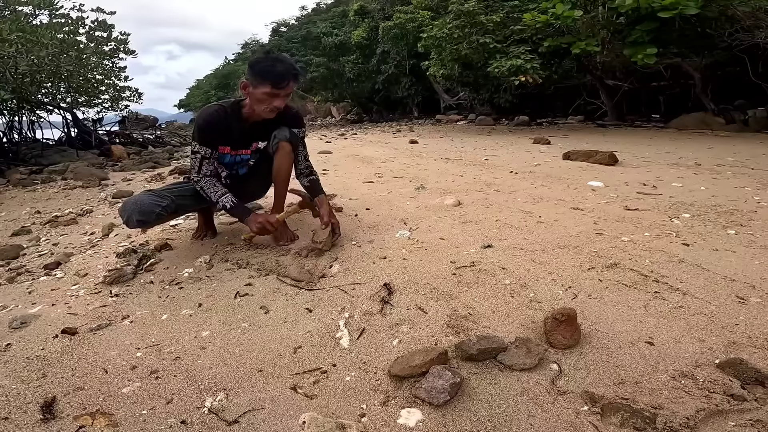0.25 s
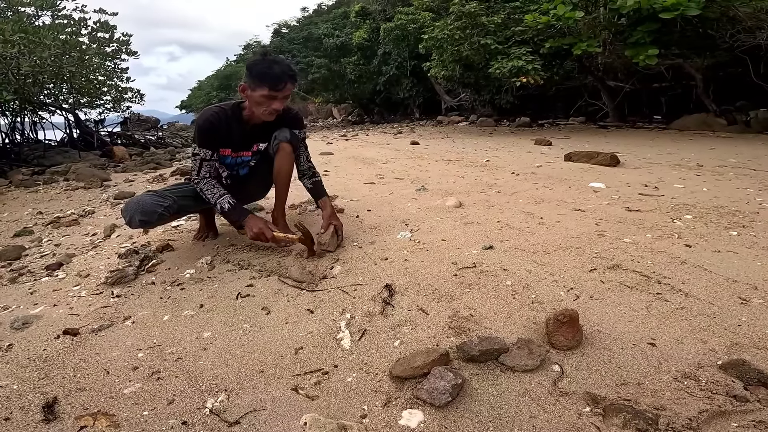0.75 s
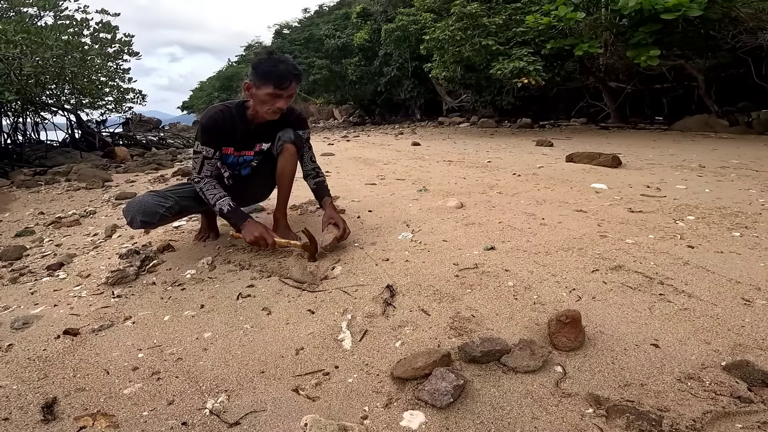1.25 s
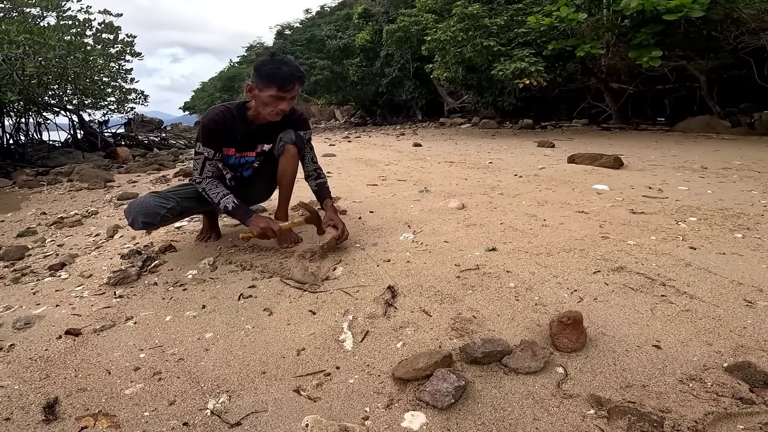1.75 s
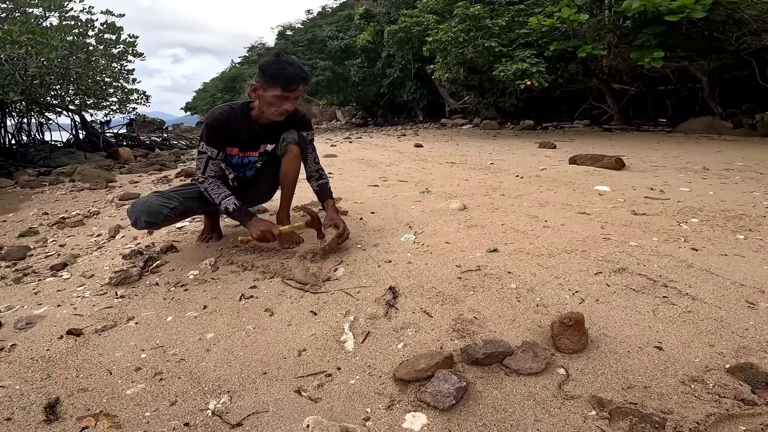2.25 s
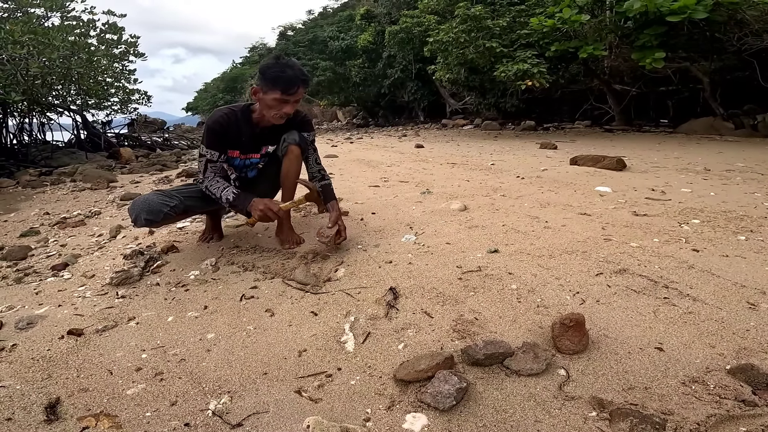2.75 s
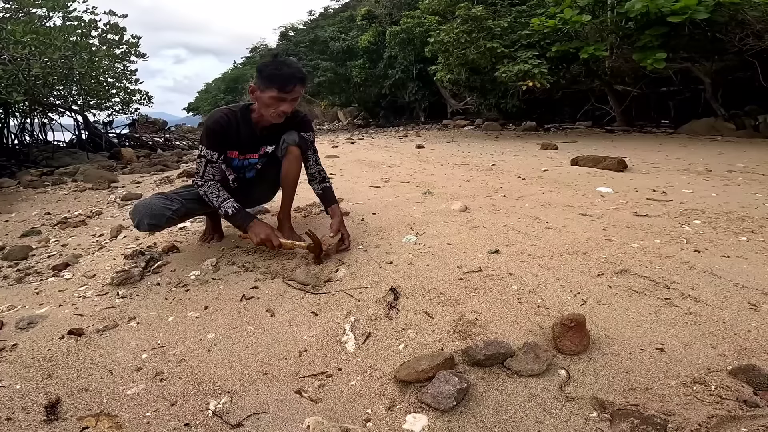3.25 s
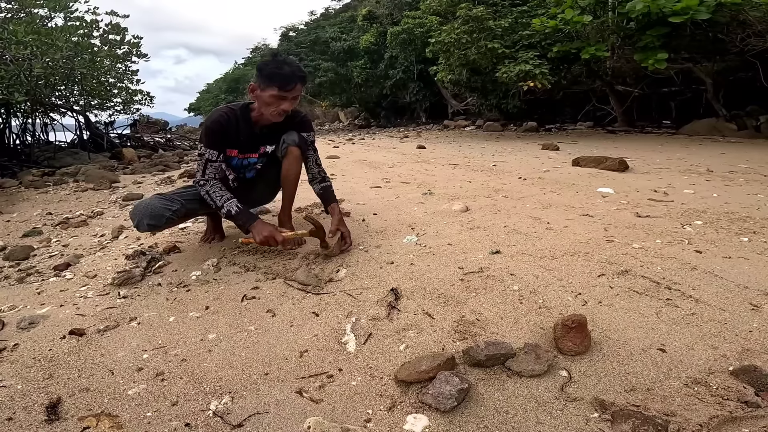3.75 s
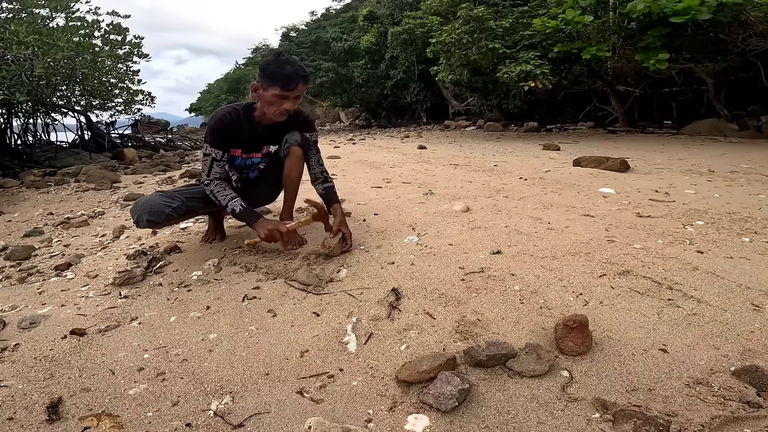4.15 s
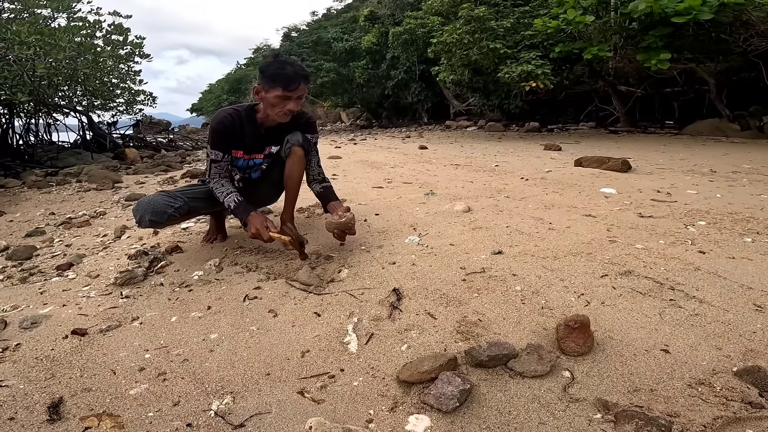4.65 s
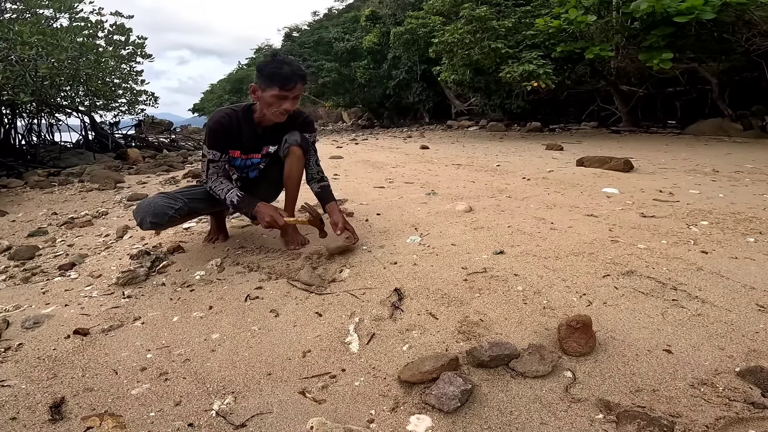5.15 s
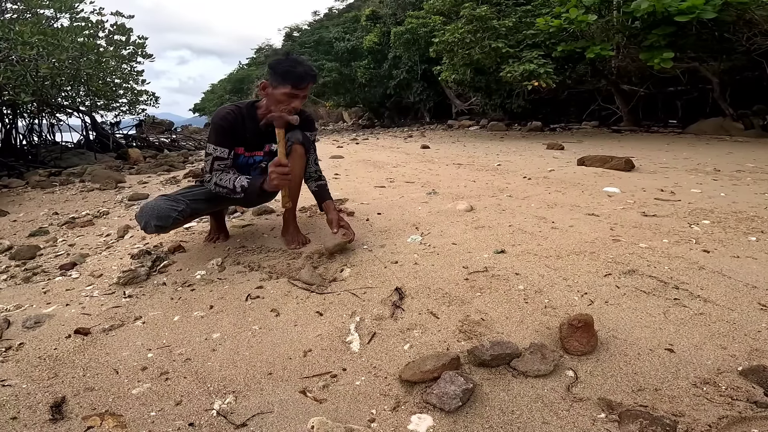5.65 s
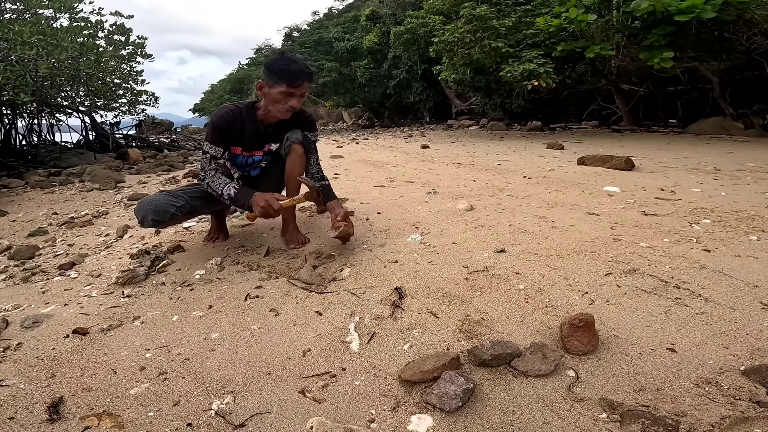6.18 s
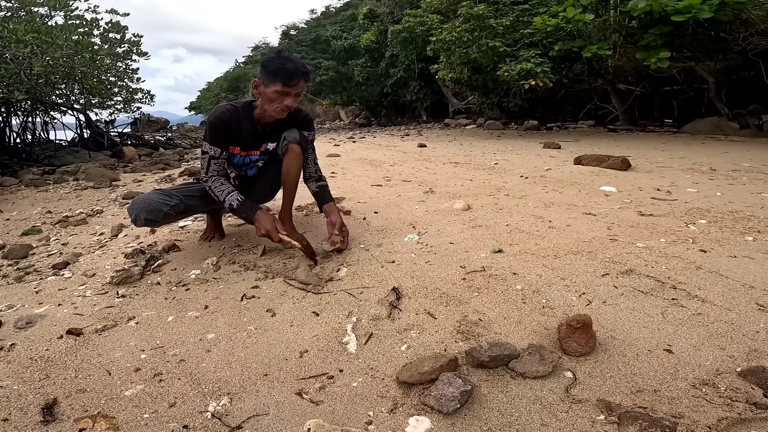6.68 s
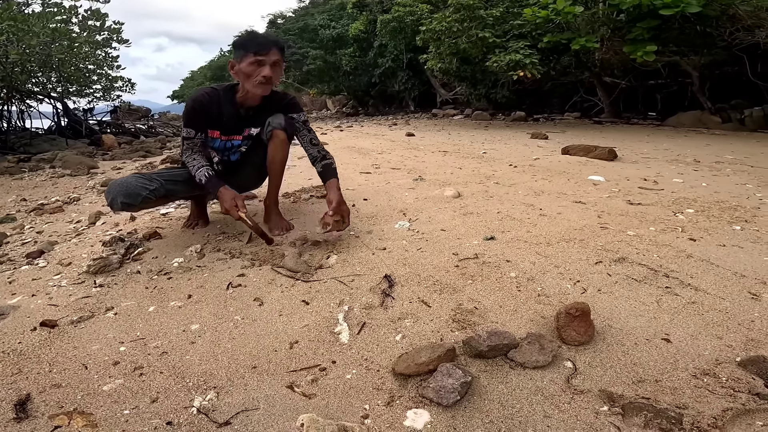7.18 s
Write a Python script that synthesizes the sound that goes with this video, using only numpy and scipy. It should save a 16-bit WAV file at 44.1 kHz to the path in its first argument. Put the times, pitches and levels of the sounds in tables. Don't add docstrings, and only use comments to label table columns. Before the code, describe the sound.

Irregular hard clacks of steel on stone, close and nearly clipping, answered by a patchy woodland echo. Early blows are spaced about half a second apart; the hardest land near four and six seconds, and a quick cluster of lighter clicks ends the action. Low wind buffets the camera microphone, strongest around six seconds, over distant surf, a wavering engine hum, faint insect buzz, bird whistles and trickling sand.

```python
import sys
import numpy as np
from scipy import signal
from scipy.io import wavfile
from scipy.ndimage import uniform_filter1d

SR = 44100
rng = np.random.default_rng(int(sys.argv[2]) if len(sys.argv) > 2 else 0)


def put_to_file(sound):
    columns = np.atleast_2d(sound).T
    safe = np.clip(columns, -1, 1)
    whole_steps = np.round(safe * 32767)
    wavfile.write(sys.argv[1], SR, whole_steps.astype(np.int16))


def decibels_to_gain(level_db):
    exponent = np.asarray(level_db, float) / 20
    return 10 ** exponent


N = 327222
T = np.arange(N) / SR
CALM_DB = -44
# delay_s, gain
NEAR_ECHOES = [(.0027, .55), (.0037, .5), (.0048, .35), (.0062, .15)]


def noise():
    return rng.standard_normal(N)


def band(x, lo_hz, hi_hz, order=2):
    edges_hz = [lo_hz, min(hi_hz, .45 * SR)]
    return signal.sosfilt(signal.butter(order, edges_hz, "band", fs=SR, output="sos"), x)


def unit(x):
    return x / np.sqrt(np.mean(x ** 2))


def walk(rate_hz):
    k = int(SR / rate_hz)
    steps = np.repeat(rng.standard_normal(N // k + 1), k)
    return unit(uniform_filter1d(uniform_filter1d(steps, k), k)[:N])


def columns(table):
    s, *rest = np.transpose(table)
    return [np.interp(T, s, c) for c in rest]


def swells(table, rest_db):
    power = decibels_to_gain(2 * rest_db)
    power = power + sum(decibels_to_gain(2 * db) * bell(T, s, length_s) for s, db, length_s in table)
    return 10 * np.log10(power)


def bell(t, centre_s, width_s):
    return np.exp(-((t - centre_s) / width_s) ** 2)


def burst(t, hz, delay_s, width_s):
    return np.sin(2 * np.pi * hz * (t - delay_s)) * bell(t, delay_s, width_s)


def decay(t, t60_s):
    return 1000. ** (-t / t60_s)


def ring(t, hz, t60_s, rise_s, delay_s=0.):
    u = np.maximum(t - delay_s, 0)
    return np.sin(2 * np.pi * hz * u) * (1 - np.exp(-u / rise_s)) * decay(u, t60_s)


def tone(table, wobble, rate_hz):
    hz, db = columns(table)
    inside = uniform_filter1d(1. * ((T > table[0][0]) & (T < table[-1][0])), size=400)
    phase = 2 * np.pi * np.cumsum(hz * (1 + wobble * walk(rate_hz))) / SR
    return np.sqrt(2) * inside * decibels_to_gain(db + 2.0 * walk(rate_hz)) * np.sin(phase)


def add(out, s, sound):
    i = int(s * SR)
    out[i:i + len(sound)] += sound[:N - i]


def wind_db():
    # peak_s, rumble_db, length_s
    gusts = [(1.01, -34.5, 0.083), (1.22, -33, 0.079), (1.61, -34.5, .1), (1.9, -38.5, 0.08),
             (3.04, -30.5, 0.048), (3.24, -29, 0.069), (3.47, -28.5, .05), (3.62, -31, .09),
             (3.86, -36.5, .05), (4.03, -42, .12), (4.73, -31.5, 0.055), (4.88, -30, 0.035),
             (5.07, -27.5, 0.091), (5.25, -29.5, 0.11), (5.46, -28, 0.065), (5.57, -28.5, 0.055),
             (5.76, -30, 0.068), (5.9, -28.5, .05), (5.99, -17, 0.0063), (6.09, -22.5, .015),
             (6.2, -17.5, 0.039), (6.36, -31.5, 0.052), (6.61, -34.5, 0.065), (6.9, -45, .1),
             (7.11, -35, 0.31)]
    return swells(gusts, CALM_DB)


def shore():
    # pitch_hz, level_db (per Hz)
    spectrum = [(120, -12), (190, -13.5), (257, -30), (381, -40), (800, -50), (4840, -55.5), (5950, -55),
                (9450, -74)]
    level_db, follows_wind = -67, 0.12
    hz, db = np.transpose(spectrum)
    out = 0
    for f in 120 * 2 ** np.arange(0, 7, .5):
        gain_db = np.interp(np.log(f), np.log(hz), db) + 1.5 * walk(14)
        out = out + decibels_to_gain(gain_db) * band(noise(), f / 1.19, f * 1.19, order=3)
    gain = decibels_to_gain(level_db + follows_wind * (wind_db() - CALM_DB))
    return out * gain / np.std(band(out, 280, 630))


def wind():
    # peak_s, buffet_db, length_s
    jolts = [(.8, -42.5, 0.055), (1.32, -41, 0.052), (1.9, -39, 0.077), (3.92, -39.5, .08),
             (4.36, -41, 0.087), (5.95, -34, 0.038), (6.08, -34.5, 0.078), (6.74, -41.5, 0.06)]
    rumble_db = wind_db()
    buffet_db = swells(jolts, -48.5) + 2 * walk(6)
    pops_db = 1.5 * (rumble_db + 25.5) - 48.5
    rumble = unit(band(noise(), 10, 48, order=3)) * decibels_to_gain(rumble_db - 2.7 + 2.5 * walk(9))
    buffet = unit(band(noise(), 68, 125)) * decibels_to_gain(buffet_db + 4.0 * walk(25))
    pops = unit(band(noise(), 140, 220, order=4)) * decibels_to_gain(pops_db + 1.0 * walk(40))
    return rumble + buffet + pops


def engine():
    # time_s, pitch_hz, level_db
    firing = [(0, 177, -49.5), (2, 174.8, -50), (4, 175, -52.5), (5.5, 172.8, -50.5), (7.42, 170.4, -56.5)]
    # time_s, pitch_hz, level_db
    throb = [(0, 81.5, -52), (2.5, 81, -51), (4.7, 81, -52), (5.2, 81, -59), (7.42, 81, -59)]
    return tone(firing, 0.0065, 14) + tone(throb, 0.0085, 4.0)


def insects():
    # peak_s, level_db, length_s
    chorus = [(.35, -68, .3), (1, -74, .3), (2.3, -78, .25), (3.05, -80, .12), (3.5, -65, .1),
              (3.8, -74.5, .15), (4.3, -78, .25), (5.5, -78.5, .12), (6.5, -67.5, .13), (7.36, -73, .12)]
    buzz = rng.standard_normal((2, N)) * decibels_to_gain(3.0 * walk(38))
    waves = unit(band(buzz[0], 5200, 6250, order=3))
    thin = unit(band(buzz[1], 6100, 6420))
    return waves * decibels_to_gain(swells(chorus, -84)) + thin * decibels_to_gain(-87 + 2.3 * walk(2))


def birds():
    # time_s, pitch_hz, level_db
    whistles = [
        [(1.11, 1834, -57), (1.128, 1820, -52), (1.228, 1910, -44), (1.242, 1810, -38), (1.285, 1831, -55)],
        [(6.945, 1850, -53), (6.961, 1890, -44.5), (6.997, 1660, -62), (7.02, 1830, -69)],
    ]
    # time_s, pitch_hz, level_db
    glides = [
        [(.205, 2980, -70.5), (.25, 3260, -63), (.3, 3660, -57.5), (.375, 4600, -59)],
        [(1.235, 1750, -57), (1.27, 1540, -55), (1.3, 1400, -47)],
        [(6.89, 1400, -65), (6.925, 1480, -57), (6.942, 1850, -59)],
        [(7.15, 1440, -58.5), (7.17, 1400, -57), (7.25, 1400, -69)],
    ]
    pulsing = .62 + .42 * np.cos(2 * np.pi * 29 * (T - 1.245))
    calls = pulsing * sum(tone(call, .006, 40) for call in whistles)
    flutter = 0.61 + .4 * walk(340)
    calls = calls + flutter * sum(tone(call, 0.0038, 280) for call in glides)
    wood = rng.standard_normal(SR // 8) * np.exp(-T[:SR // 8] / 0.035)
    return .9 * calls + .45 * signal.fftconvolve(calls, wood / np.linalg.norm(wood))[:N]


def sand():
    # peak_s, level_db, length_s
    slides = [(.1, -82, 0.048), (1.3, -86.5, 0.27), (2.2, -87, 0.35), (2.8, -81, .2), (3.45, -84.5, 0.14),
              (4.48, -85, 0.0984), (5.1, -81, .12), (6.05, -70.5, 0.055), (6.5, -88.5, 0.13),
              (6.8, -86, .08), (7.32, -78.5, 0.091)]
    landed = rng.random(N) < 3000 / SR
    ticks = landed * decibels_to_gain(2.6 * rng.exponential(size=N)) * noise()
    return unit(band(ticks, 3900, 9700, order=1)) * decibels_to_gain(swells(slides, -96) + 4.0)


def blow_hits():
    # start_s, force_db, stone_pitch_hz, sand_thud_db, tree_echo_s
    blows = [(0.0207, -3, 1560, -19.5, 0.22), (.386, 0.5, 1885, -21, 0.39), (0.7408, -15, 1662, -19, 0.15),
             (1.306, -3.5, 2600, -27, 0.34), (1.8753, -3.5, 2344, -15.5, 0.37),
             (2.389, -2.5, 2379, -18, 0.34), (3.2793, -7, 1800, -22.5, .2), (3.8368, 4, 2447, -11.5, 0.52),
             (4.2998, -1.5, 1919, -17.5, 0.29), (5.8605, 6.5, 2637, -7.5, 0.4),
             (6.719, -16, 1596, -24, 0.15), (6.7268, -15, 1432, -15, 0.057)]
    # handle_knock_db, edge_click_db, mode_1_db, mode_2_db, mode_3_db (steel head)
    strikes = [(-24, -33.5, -18, -36, -23.5), (-33.5, -12.5, -0.5, -33, -13),
               (-22.5, -23.5, -7.5, -23.5, -14), (-32, -41.5, -21.5, -20.5, -16),
               (-31, -44, -5.5, -17, -42), (-23.5, -40.5, -12.5, -13.5, -35.5),
               (-24, -29.5, -28, -22.5, -10), (-16.5, -11.5, -6, -39.5, -44.5), (-21, -37.5, -26, -28, -45),
               (-13, -18.5, -8, -13.5, -19), (-24, -41, -26.5, -34, -25), (-14, -21.5, -15.5, -25.5, -17)]
    rows = []
    for (s, db, hz, thud_db, depth_s), (knock_db, click_db, a, b, c) in zip(blows, strikes):
        rows.append(dict(
            s=s, hz=hz, crack_db=-3 + min(.2 * db, 1.38 * (db + 8.5)), held_db=max(db, -10) + 2.5,
            knock_db=knock_db, thud_db=thud_db, click_db=click_db, modes_db=(a, b, c, (b + c) / 2 - 14),
            echo_db=db, treble_db=min(-24.5 - 4.6 * db, 0), depth_s=depth_s))
    return rows


def tap_hits():
    # start_s, crack_db, handle_knock_db, thud_db, steel_ring_db
    taps = [(0.7668, -39, -32.5, -37.5, -51), (1.0804, -51, -41, -48, -78.5), (1.682, -36, -27, -45.5, -75),
            (2.949, -28, -26, -41, -47), (3.3033, -20, -31, -30.5, -28.5), (3.6206, -51, -41, -52, -76),
            (3.7464, -54.5, -70, -52.5, -79), (4.3323, -30, -30.5, -22, -42.5),
            (5.2064, -45, -37, -46.5, -68.5), (5.257, -47.5, -46.5, -51, -83.5),
            (6.4819, -21.5, -28, -36.5, -55), (6.7705, -30, -38, -36.5, -32.5),
            (6.9611, -43, -41, -62, -74), (7.0274, -21, -28.5, -49, -29.5),
            (7.0284, -17, -23.5, -30.5, -57), (7.0691, -27, -16.5, -34.5, -35),
            (.276, -66, -52.5, -61, -95)]
    modes_db = np.array((-5.5, -9.5, -.5, -15))
    return [dict(
        s=s, hz=1640, crack_db=db, held_db=2.5,
        knock_db=knock_db, thud_db=thud_db, click_db=db - 22, modes_db=ring_db + modes_db,
        echo_db=db - 2.5, treble_db=-16, depth_s=.14) for s, db, knock_db, thud_db, ring_db in taps]


def trees(hits, steel):
    # pitch_hz, level_db, t60_s
    tree_bands = [(503, 1, .3), (730, 3.5, .4), (980, -12.5, .6), (1400, -3.5, 1), (2000, -1.5, .8),
                  (2950, -5.5, .75), (4000, -2, .62), (5700, -4.5, 0.7), (7550, -10.5, .3),
                  (11000, -11.5, .26), (14000, -19, .2)]
    out, t = np.zeros(N), np.arange(int(.6 * SR)) / SR
    swell = np.clip((t - .004) / 0.036, 0, 1)
    hz, gain_db, t60_s = np.transpose(tree_bands)
    trunks = decibels_to_gain(1.37 * walk(130)[:len(t)])
    size = N + len(t)
    leaves = []
    for f in hz:
        rustle = unit(band(rng.standard_normal(size), f / 1.3, f * 1.252, order=3))
        leaves.append(rustle * decibels_to_gain(2.4 * np.resize(walk(25), size)))
    leaves = np.array(leaves)
    fade = decibels_to_gain(gain_db)[:, None] * decay(t, t60_s[:, None])
    for hit in hits:
        db, stone_hz = hit["echo_db"], hit["hz"]
        octaves = np.log2(hz / (1.014 * stone_hz)) - .032 * max(db, 0)
        hump = decibels_to_gain(-np.where(octaves < 0, 19, 16) * octaves ** 2) + 0.17
        colour = hump + decibels_to_gain(hit["treble_db"]) * (hz > stone_hz)
        recover = 1 - np.exp(-t / (.004 + .016 * decibels_to_gain(db)))
        i = int(hit["s"] * SR)
        wash = colour @ (fade * leaves[:, i:i + len(t)])
        shift = 1 + .15 * rng.standard_normal(len(NEAR_ECHOES))
        wash = wash + sum(.7 * g * np.roll(wash, int(d * k * SR)) for (d, g), k in zip(NEAR_ECHOES, shift))
        envelope = recover * swell * trunks * bell(t, 0, hit["depth_s"])
        add(out, hit["s"], decibels_to_gain(db - 35.5) * envelope * wash)
    answer = swell * bell(t, 0, 0.15) * (fade * leaves[:, :len(t)]).sum(axis=0)
    return out + decibels_to_gain(-51.5) * signal.fftconvolve(np.diff(steel, n=2), answer)[:N]


def ghosts(true):
    block_s = 512 / 48000
    x = np.pad(band(true, 500, 6900, order=1), (0, SR))
    return sum(decibels_to_gain(db) * x[int(k * block_s * SR):][:N] for k, db in enumerate((-23, -35, -50.5), start=1))


def sand_thud(t, hit):
    bed = ring(t, 215, .04, 0.0052, delay_s=0.0039) + 0.21 * ring(t, 120, 0.05, .002, delay_s=0.0023)
    return decibels_to_gain(hit["thud_db"] + 12.5) * bed


def handle_knock(t, hit):
    handle = .8 * ring(t, 510, 0.029, 0.0012) + 0.59 * ring(t, 1070, .016, 0.0001)
    handle = handle + 0.89 * ring(t, 770, .018, 0.00046, delay_s=0.0011)
    return decibels_to_gain(hit["knock_db"] + 6) * handle


def steel_head(t, hit):
    # pitch_hz, t60_s
    modes = [(3780, 0.022), (4440, 0.05), (6220, 0.031), (7930, 0.042)]
    out = 0
    for db, (hz, t60_s) in zip(hit["modes_db"], modes):
        out = out + decibels_to_gain(db) * ring(t, hz * (1 + 0.0015 * rng.standard_normal()), t60_s, 0.0015)
    return out


def edge_click(t, hit):
    hiss = unit(band(rng.standard_normal(len(t)), 4100, 16000))
    return decibels_to_gain(hit["click_db"] - 4.0) * hiss * (bell(t, .0007, .0004) + .07 * decay(t, .02))


def stone(t, hit):
    grit = unit(band(rng.standard_normal(len(t)), 1050, 1.8 * hit["hz"], order=4))
    sound = 1.45 * burst(t, 1.04 * hit["hz"], .0008, .0004) + .25 * grit * bell(t, .0008, .0005)
    for delay_s, gain in NEAR_ECHOES:
        hz = hit["hz"] * 1.1 ** rng.standard_normal()
        sound = sound + gain * (burst(t, hz, delay_s, .0006) + .4 * grit * bell(t, delay_s, .0007))
    return decibels_to_gain(hit["crack_db"] + 3) * (sound + 0.14 * grit * decay(t, 0.036))


def pick(hits):
    heard, true, steel = np.zeros((3, N))
    t = np.arange(int(.12 * SR)) / SR
    for hit in hits:
        crack, head, knock = stone(t, hit), steel_head(t, hit), handle_knock(t, hit)
        start_s = hit["s"] + .0003
        add(heard, start_s, crack + edge_click(t, hit) + head + knock + sand_thud(t, hit))
        add(true, start_s, decibels_to_gain(hit["held_db"]) * (crack + .5 * knock))
        add(steel, start_s, decibels_to_gain(hit["held_db"]) * head)
    return heard, true, steel


def scene():
    hits = blow_hits() + tap_hits()
    heard, true, steel = pick(hits)
    background = shore() + wind() + engine() + insects() + birds() + sand()
    return (background + trees(hits, steel) + ghosts(true) + heard)[None]


def low_pass(x):
    return signal.sosfilt(signal.butter(12, 16380, fs=SR, output="sos"), x)


def record(dry):
    top = signal.ellip(8, .2, 60, 16200, fs=SR, output="sos")
    return low_pass(np.clip(signal.sosfilt(top, dry), -1, 1))


dry = scene()
out = record(dry)
put_to_file(out)
```